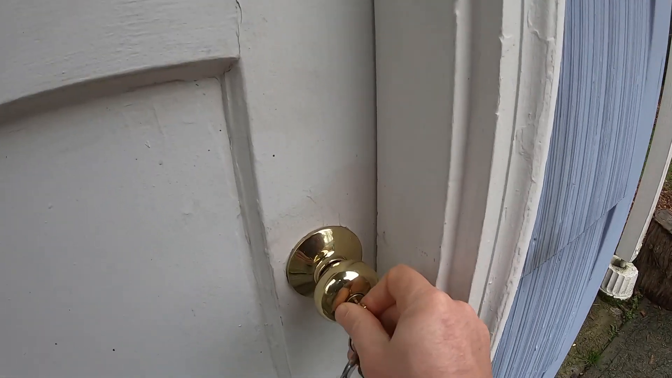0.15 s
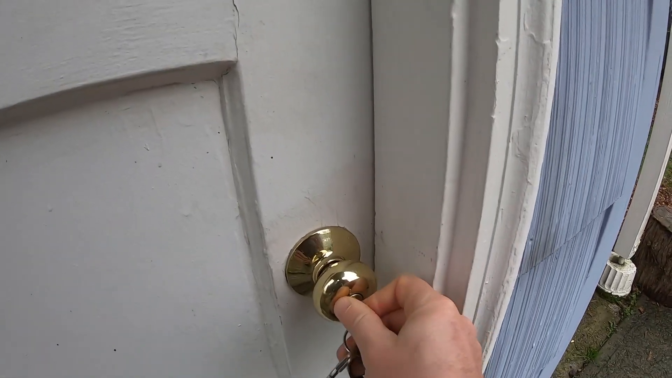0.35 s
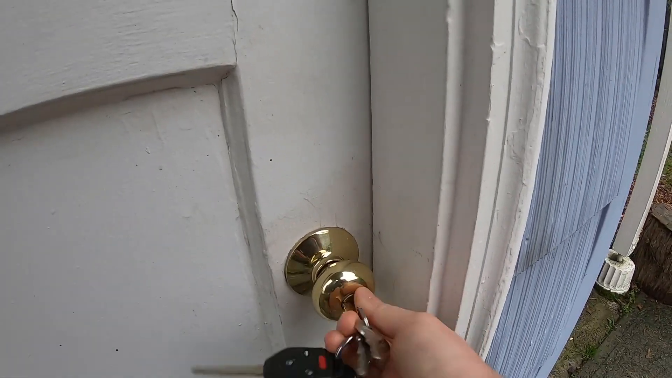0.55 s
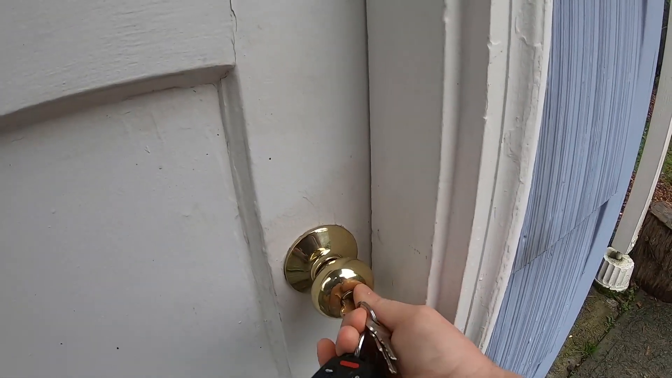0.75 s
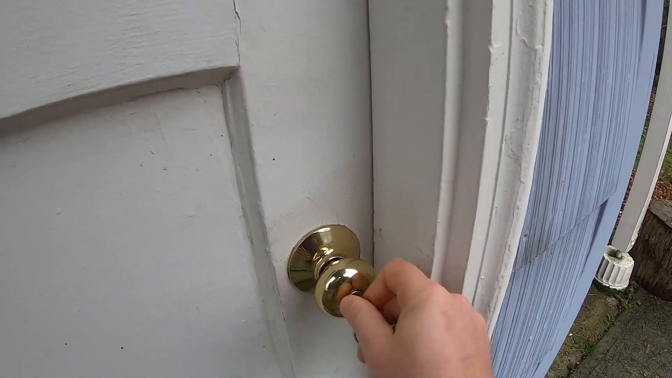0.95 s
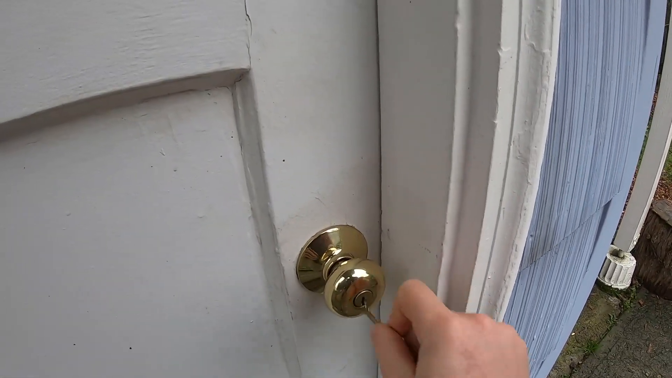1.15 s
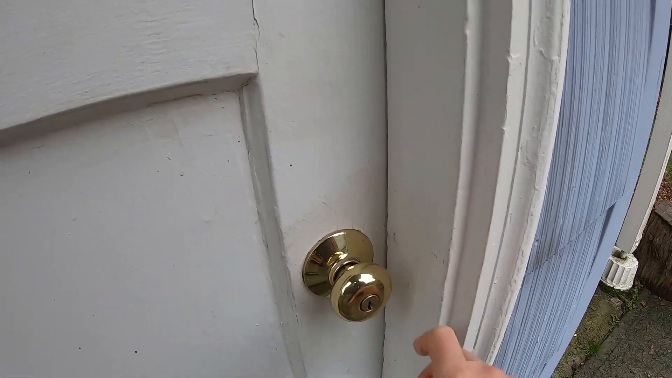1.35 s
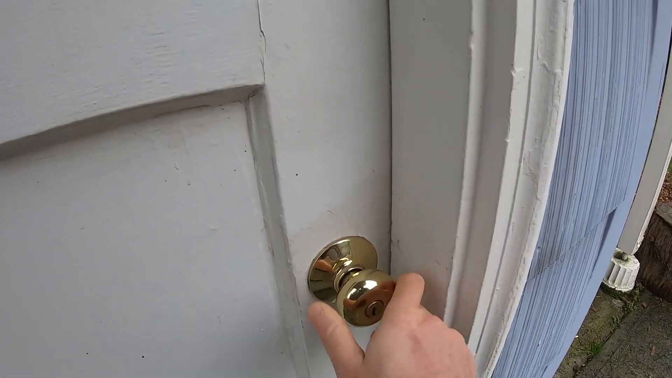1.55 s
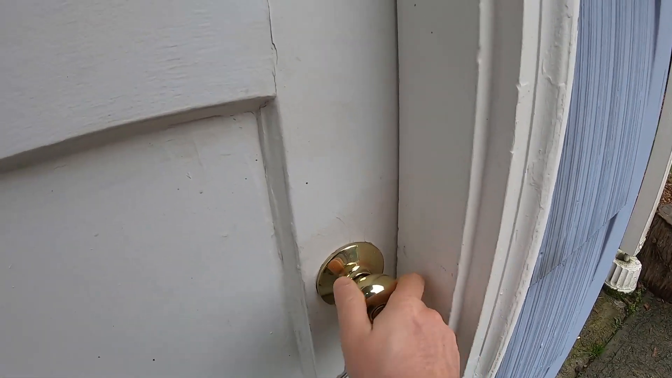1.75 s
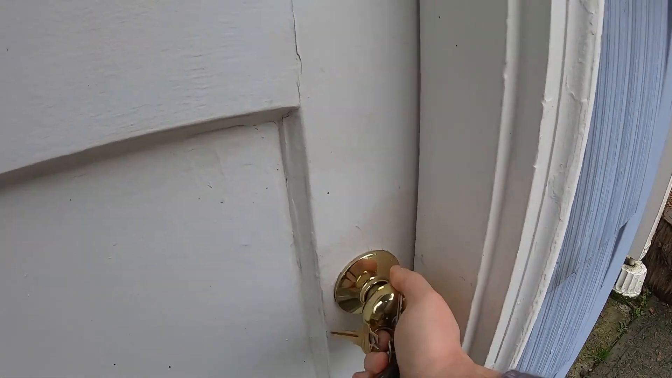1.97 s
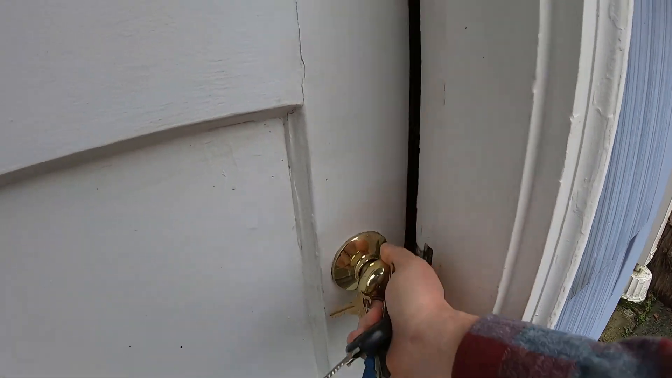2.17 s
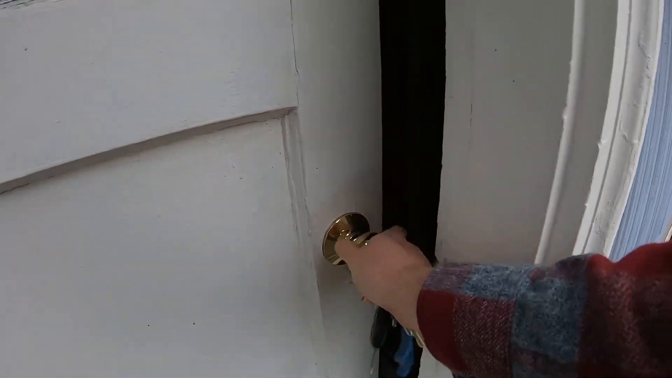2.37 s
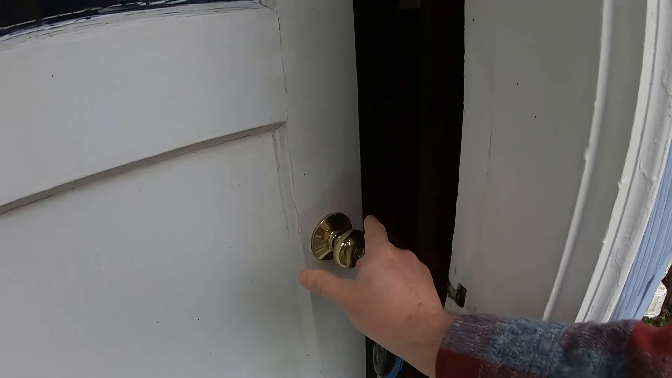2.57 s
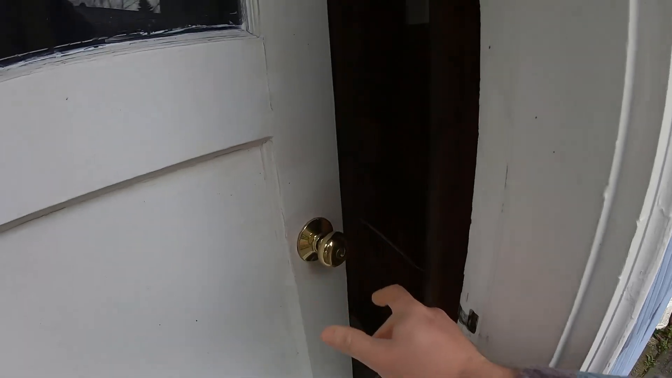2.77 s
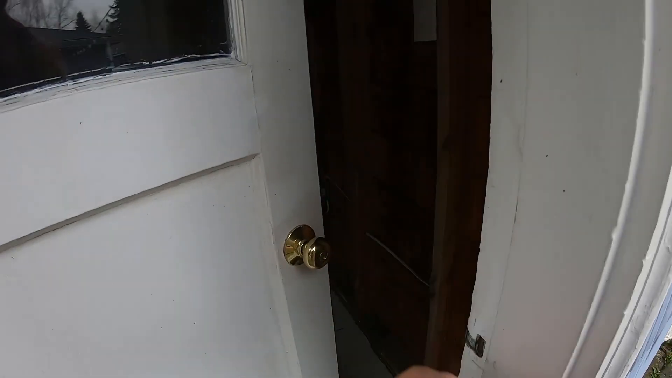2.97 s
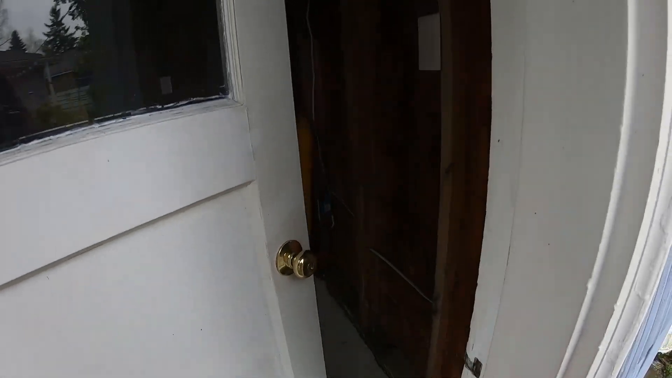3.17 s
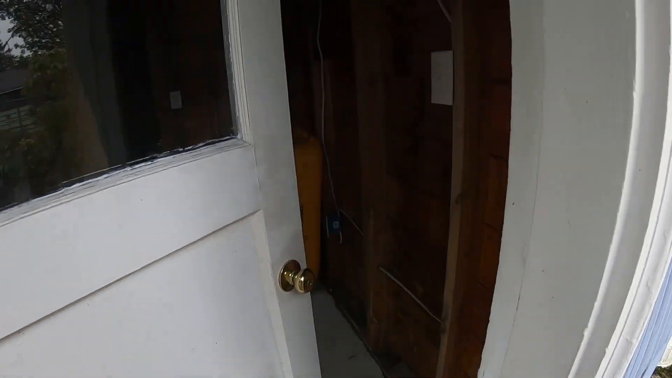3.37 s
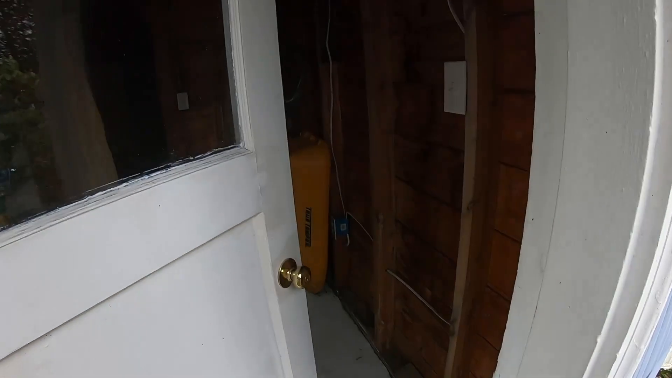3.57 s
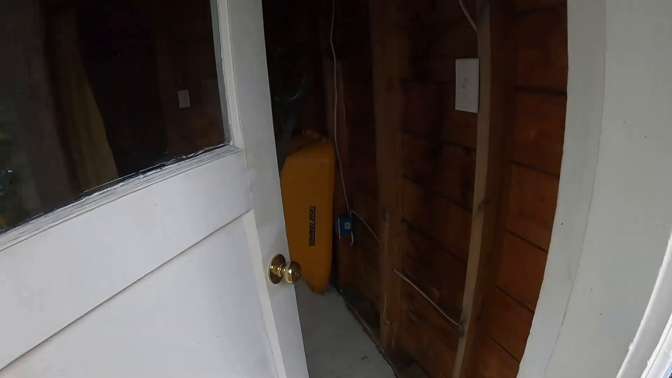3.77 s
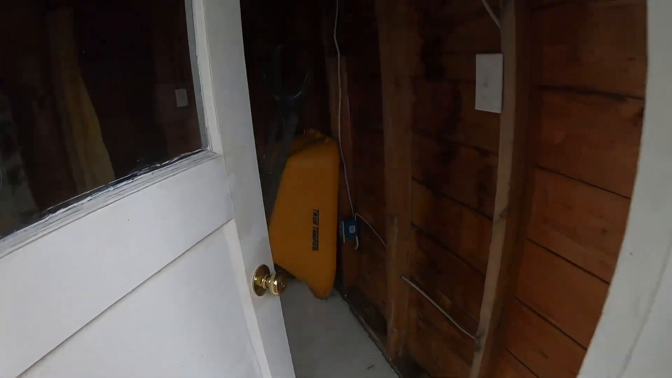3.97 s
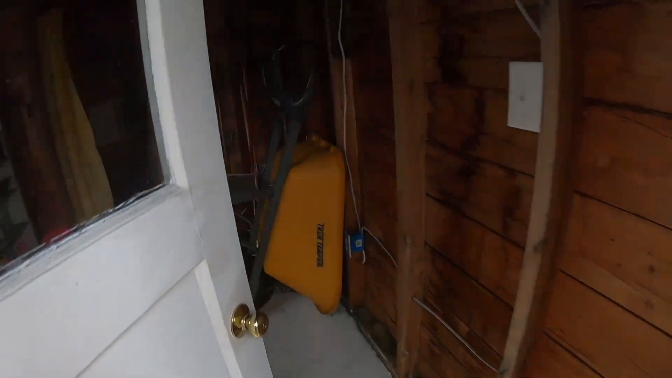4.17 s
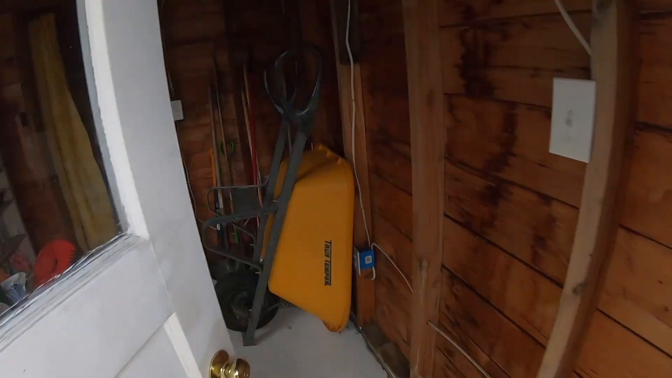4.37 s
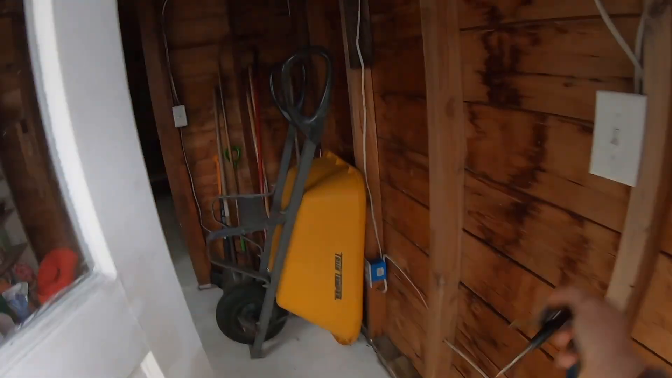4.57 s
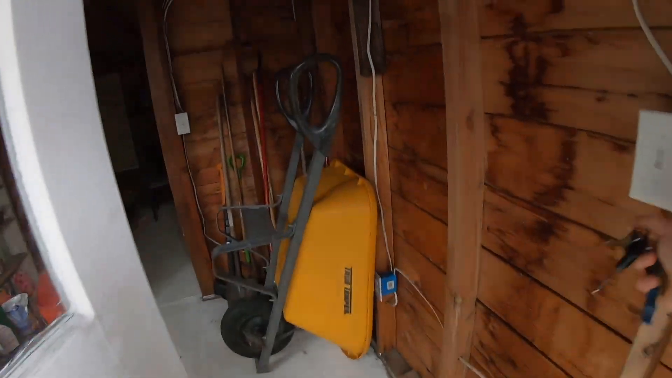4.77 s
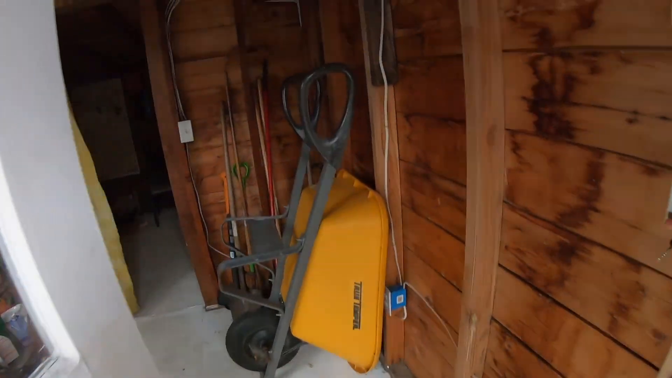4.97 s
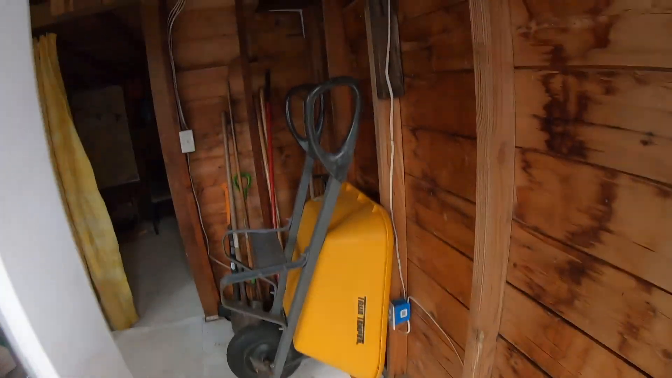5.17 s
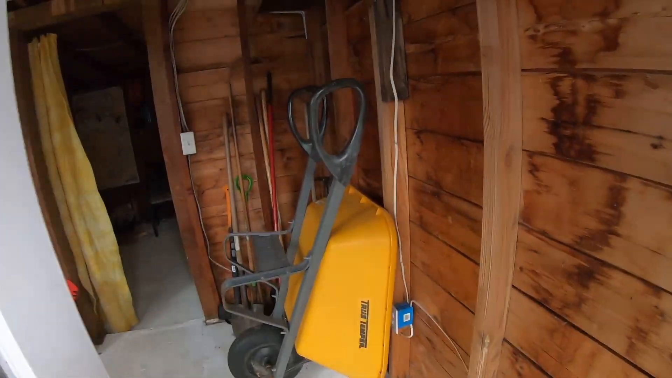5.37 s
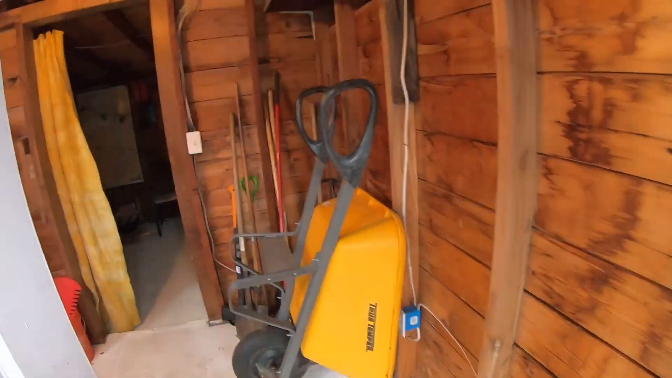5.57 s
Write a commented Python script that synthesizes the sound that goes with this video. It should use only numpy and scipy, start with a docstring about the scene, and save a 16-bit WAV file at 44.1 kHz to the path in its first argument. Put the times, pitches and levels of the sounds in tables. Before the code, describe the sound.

A close stereo microphone stands by a wooden door outdoors. From the start to about 1 second, a key clicks and scrapes in a brass knob lock, with low thumps from the door panel. Near 1.2 seconds the key ratchets quickly out over the pins and the bunch tinkles. From about 1.5 to 2.5 seconds the knob and latch rattle and clack, and the door opens with hollow booms. The keys keep chiming in the hand in short shakes, brightest and loudest from 3.7 to 4.4 seconds, ending around 4.6. A few soft, blunt footsteps land on boards between 4.6 and 5 seconds. At about 5.4 seconds a wall switch snaps sharply, a little to the side, with a short room echo. Underneath, a distant engine drones, slowly falling in pitch, over a soft outdoor hiss and rumble that ease toward the end.

```python
"""On the doorstep, a close stereo microphone by a wooden door. A key turns in the brass knob lock and
ratchets out over the pins; the knob is twisted and the door swings in, its panel booming. The bunch
chimes and clacks in the hand as key strikes key. Shoes step onto the boards inside and, off to the side,
a wall switch snaps. All along, a far engine drones with falling pitch over the outdoor wash."""
import sys
import numpy as np
from scipy import signal
from scipy.fft import rfft, irfft, next_fast_len
from scipy.io import wavfile
from scipy.ndimage import uniform_filter1d

SR = 44100
rng = np.random.default_rng(int(sys.argv[2]) if len(sys.argv) > 2 else 0)


def to_wav(s):
    """Save 16-bit WAV."""
    ch = np.atleast_2d(s).T  # columns
    pcm = np.round(np.clip(ch, -1, 1) * 32767)  # PCM
    wavfile.write(sys.argv[1], SR, pcm.astype(np.int16))


N = 248283

# blows in lock, knob and latch: start_s, metal_db, wood_db, treble_db, favoured_hz, tick_over_rattle_db
LOCK_BLOWS = [(0.0531, -20.5, -25.5, -27.5, 4000, 6.5), (0.0813, -17, -14.5, -16, 2770, 6),
              (0.0844, -9, -11, -32, 3630, 9), (0.1213, -32, -22.5, -46, 3320, 23),
              (0.156, -28, -36, -32.5, 5930, 11), (0.5075, -4.5, -10, -22, 3410, 5),
              (0.5145, -13.5, -11, -15.5, 5650, 9), (0.5185, -4.5, -12, -17, 3750, 5),
              (0.5432, -22.5, -29, -29.5, 5470, -1), (0.5697, -26, -29, -35, 2050, -5),
              (.6047, -31, -39, -32, 4030, 14), (.6165, -33, -43, -30, 4500, 12),
              (.6245, -30, -36, -31, 5500, 10.5), (0.6443, -22.5, -49, -22, 4930, 4.5),
              (0.6478, -10, -27.5, -18, 3330, 25.5), (0.675, -16.5, -36, -19, 1700, 7.5),
              (0.676, -17, -52, -17, 3450, 22), (0.6872, -6, -44, -8.5, 3130, 15),
              (.7045, -16, -56, -20, 2900, 12.5), (0.7197, -26, -55, -23, 1800, 8),
              (0.8598, -26, -44, -52, 3700, 30), (0.8864, -16.5, -25, -31, 3700, 14),
              (.948, -40, -39, -40, 5000, 12), (.977, -34, -37, -40, 5030, 6),
              (1.043, -20, -41, -35, 3540, 19), (1.0952, -24, -22.5, -31, 3170, 8),
              (1.1199, -13.5, -24.5, -21.5, 3640, 10.5), (1.194, -25, -44, -26, 4460, 11),
              (1.457, -18.5, -39, -22, 3730, 24), (1.5272, -27.5, -14, -34.5, 1500, 4),
              (1.674, -27.5, -19.5, -43, 1510, 11), (1.7571, -21, -22.5, -49, 3100, 13),
              (1.772, -43, -27, -57, 3470, 4), (1.8068, -14.5, -20.5, -39, 3150, 10.5),
              (1.8364, -24, -20.5, -28, 3090, 8.5), (1.846, -13.5, -36, -47, 3770, 9.5),
              (1.854, -7.5, -38, -24, 5760, 19), (1.872, -9.5, -16.5, -23, 3400, 18),
              (1.9644, -27.5, -50, -31, 3240, 8), (1.9801, -11.5, -27.5, -21, 3320, 5.5),
              (1.9938, -13, -16, -15.5, 3320, 8.5), (2.0207, -17.5, -46, -29, 2210, 6),
              (2.0468, -18.5, -10, -25, 2970, -12), (2.0541, -17, -21, -28, 1660, 19),
              (2.092, -19.5, -24, -25, 2440, 15), (2.137, -25, -23, -32, 2120, 3),
              (2.1516, -27, -34.5, -34, 5160, 4), (2.3184, -30, -30.5, -40, 1790, 2),
              (2.345, -30, -27.5, -38, 2100, -34), (2.3813, -16, -17.5, -23.5, 1910, 2),
              (2.393, -11, -15.5, -20, 1900, -1), (2.4087, -24.5, -27, -32, 2300, 3)]
# small irregular clicks and scrapes of key, knob and latch: start_s, end_s, metal_db, wood_db
LOCK_RATTLES = [(0.095, 0.14, -35, -32), (0.578, 0.606, -33.5, -29), (0.695, 0.744, -38, -61),
                (0.799, 0.942, -40, -35.5), (1.726, 1.973, -37, -32), (1.98, 2.04, -26, -26.5),
                (2.209, 2.306, -43, -49), (2.424, 2.496, -35, -34)]
# door panel and boards are jolted: start_s, boom_db, thud_db, knock_db
DOOR_JOLTS = [(0.058, -5, -39, -46), (0.087, -17, -11, -13.5), (0.518, -32, -45, -50),
              (1.101, -3.5, -17, -23.5), (1.124, -13.5, -30, -16), (1.53, -44, -27, -35),
              (1.812, -33, -15, -16.5), (1.859, -40, -17, -18.5), (1.992, -8.5, -10.5, -5.5),
              (2.05, -28, -11.5, -17), (2.15, -24, -18, -16), (2.33, -8, -23, -25),
              (2.378, -10, -11.5, -14.5), (2.44, -16, -15, -23), (2.658, -23, -48, -56),
              (4.706, -48.5, -19.5, -22), (4.746, -47, -20, -41), (4.949, -47.5, -15.5, -24.5),
              (5.439, -50, -11, -41)]
# keys and fob knock together: start_s, middle_db, treble_db, favoured_hz
BUNCH_CLACKS = [(1.3482, -33.5, -34, 2230), (1.384, -32, -32, 3100), (2.648, -34.5, -32, 3480),
                (2.662, -56, -40, 4800), (3.115, -28.5, -27, 2200), (3.302, -24.5, -30.5, 4970),
                (3.705, -26, -35, 6300), (3.733, -31, -30.5, 5760), (3.7712, -24, -26, 5760),
                (3.8012, -18, -18, 3540), (3.808, -18, -48, 5700), (3.851, -22, -23, 3880),
                (3.8712, -49, -41, 2910), (3.9898, -28, -36, 5310), (4.047, -25.5, -26, 3140),
                (4.094, -13, -13, 2460), (4.107, -17, -21, 3000), (4.1416, -25.5, -31, 2850),
                (4.173, -26.5, -29, 1660), (4.209, -18, -26.5, 2850), (4.2538, -21.5, -19.5, 2360),
                (4.3, -23.5, -29, 2500), (4.353, -28, -32, 1620), (4.5505, -18.5, -18.5, 5500),
                (4.568, -21.5, -28, 5100), (4.586, -17.5, -17.5, 4150), (4.6095, -25.5, -28, 4540)]
# a key blade is struck, gripped or free: start_s, peak_db, favoured_hz, t60_factor
KEY_STRIKES = [(1.001, -47, 6900, 0.33), (1.348, -27.5, 10100, 1.2), (1.3851, -23, 10130, 0.52),
               (1.4151, -37, 10330, .6), (1.9845, -13.5, 6950, 1.1), (1.9994, -20.5, 6770, 0.43),
               (2.0194, -22, 8110, 1.8), (2.4094, -23, 6800, 1.1), (2.414, -26.5, 10600, 1.2),
               (2.421, -27, 6180, 1.1), (2.598, -33.5, 7020, 0.35), (2.646, -19, 6555, 0.38),
               (2.651, -52, 10000, 0.48), (2.6664, -29, 9600, 1.8), (2.7294, -35, 6530, 0.92),
               (2.7694, -38, 9500, 0.76), (2.9452, -33.5, 9860, .6), (3.037, -35, 6480, .6),
               (3.043, -37.5, 14600, 0.74), (3.1154, -21, 9400, 0.46), (3.124, -29, 10090, 0.9),
               (3.12, -34, 6580, 1.4), (3.187, -39, 8740, .4), (3.2455, -27.5, 6590, 0.78),
               (3.251, -38.5, 10120, .8), (3.2804, -36, 9480, .6), (3.307, -32, 9800, 0.65),
               (3.3572, -30, 9700, 0.49), (3.709, -41, 6550, .8), (3.792, -7, 8940, 0.26),
               (3.7975, -6.5, 9600, 0.56), (3.809, -15, 10120, .5), (3.803, -26, 14000, 0.54),
               (3.8294, -21, 9300, 1.3), (3.9913, -21, 9550, 1.3), (3.993, -36.5, 6555, 1.2),
               (4.0094, -25, 9740, 0.95), (4.0716, -14.5, 9430, 1.1), (4.094, -20.5, 10500, 0.65),
               (4.137, -35, 8110, 1), (4.2388, -20, 6200, .8), (4.3023, -17.5, 6300, 0.38)]
# the bunch is shaken: start_s, end_s, level_db
BUNCH_SHAKES = [(1.312, 1.412, -44.5), (1.98, 2.04, -52), (2.41, 2.465, -38.5), (2.635, 2.845, -43.5),
                (2.933, 3.094, -52.5), (3.088, 3.236, -49), (3.233, 3.375, -43.5), (3.695, 3.775, -41),
                (3.79, 3.892, -46.5), (3.905, 3.962, -50), (3.977, 4.38, -30), (4.529, 4.69, -48)]
# shoes on sill and floor: start_s, middle_db, boards_db, treble_db, favoured_hz
FOOTFALLS = [(4.642, -32, -41, -60, 2000), (4.7152, -24.5, -32.5, -34, 2360),
             (4.7425, -28.5, -17.5, -45, 3640), (4.795, -57, -54, -59, 2000), (4.8877, -59, -28, -67, 2760),
             (4.919, -51, -32, -69, 1560), (4.9752, -62, -31.5, -68, 1525)]
# the switch lever's contacts: start_s, middle_db, wall_db, treble_db, favoured_hz
LEVER_BLOWS = [(5.369, -38.5, -37, -66, 2330), (5.4097, -33.5, -45, -39, 3550),
               (5.4291, -7, -9, -15.5, 3900), (5.442, -19.5, -19.5, -22, 1660),
               (5.598, -58, -44, -60, 2500)]
# resonances of lock, bunch, floor and switch: pitch_hz, width_hz, level_db
LOCK_MODES = [(363, 43, 5), (518, 153, -4), (746, 320, -10), (873, 223, 1), (1277, 720, -1),
              (1763, 350, 2.5), (2420, 310, 0.5), (3390, 580, -2.5), (3720, 520, -1), (4530, 1130, 1),
              (5510, 850, -4), (6750, 4300, 8), (8030, 1600, 10), (10040, 390, 0), (11800, 1700, -10.5)]
BUNCH_MODES = [(1107, 200, -1), (1750, 330, 1.5), (2436, 120, -3.5), (2814, 310, 0.5), (3440, 700, -2),
               (4090, 960, -1.5), (5464, 1180, 1.5), (6060, 1830, 12.5), (7420, 2800, 2), (9520, 230, 3),
               (12200, 1200, -26.5), (13150, 2100, -37.5)]
FLOOR_MODES = [(204, 40, -10), (313, 145, 5.5), (504, 490, -2.5), (736, 1100, -8), (2210, 960, -10),
               (4320, 8700, 18), (6560, 5000, -1)]
SWITCH_MODES = [(787, 130, -0.5), (1025, 130, 12), (1204, 200, -3), (1650, 94, 7.5), (2140, 180, 5),
                (2480, 470, -4), (2900, 650, -9), (3670, 500, -4), (4150, 540, -6.5), (5240, 880, -10.5),
                (6100, 4300, 28), (9100, 1400, -7)]
# ringing modes of the door panel and of free keys: pitch_hz, level_db, t60_s
PANEL_MODES = [(35.3, -8, 0.98), (53.6, 0.5, 0.27), (128.4, 3, 0.11), (191, -7.5, 0.21), (217.3, -9.5, 0.2),
               (317, 1.5, 0.049), (397.6, -5.5, 0.093)]
BLADE_MODES = [(5650, -11, .06), (6180, -8, .13), (6550, -2, .13), (7300, -16, .05), (8100, -6, .13),
               (8900, -14, .05), (9385, -9, .05), (9525, -1, .14), (9850, -9, .05), (10090, -4, .12),
               (10560, -10, .06), (10750, -9, .12), (11460, -13, .16), (11930, -21, .07), (12520, -14, .15),
               (13250, -17, .13), (13440, -22, .08), (13920, -16, .12), (14100, -20, .11),
               (14510, -15, .15)]
# the far engine swells and fades: time_s, level_db
ENGINE_LEVELS = [(0.0, -31.5), (0.11, -22.5), (0.34, -45.5), (0.69, -24.5), (0.75, -29.5), (1.18, -25),
                 (1.22, -44), (1.32, -30), (2.07, -24), (2.26, -30), (2.37, -17), (2.62, -40),
                 (2.92, -23.5), (3.31, -37.5), (3.93, -38.5), (4.04, -29), (5.6, -45.5), (5.63, -51)]
# course of the outdoor wash: time_s, hiss_db, rumble_db, deep_rumble_db
WASH_LEVELS = [(0.0, -38, -34, -55), (0.22, -40, -33.5, -38), (0.64, -39.5, -37.5, -39.5),
               (2.35, -40, -35, -25.5), (2.9, -41.5, -38, -43.5), (3.3, -40, -37, -53),
               (3.8, -40, -39.5, -46), (4.97, -45.5, -38.5, -56), (5.63, -48, -38.5, -66)]
# tone colour of the wash: pitch_hz, density_db
WASH_SPECTRUM = [(25, -17), (53, -3), (86, -0.5), (213, -13), (270, -25), (330, -16.5), (450, -25),
                 (833, -21.5), (1310, -25), (5140, -33), (7500, -39.5), (9770, -50.5), (15000, -79.5)]
# stereo image from door, room and distance: pitch_hz, likeness_ratio, left_over_right_db, left_lead_rad
MIC_DOOR = [(250, 1, 2.5, 0.81), (555, 0.92, -0.5, 0.11), (855, 0.67, 7.5, -1.5), (1750, 0.83, 1.5, 1),
            (2980, 1, -0.5, 0.81), (3680, 1, 0.5, 1), (5440, 0.081, -3, 0.29), (8000, 0.28, -2.5, 0.92),
            (12100, 0.13, 0, 1)]
MIC_ROOM = [(200, 0.97, -1, 0.079), (845, 0.64, 0, 0.28), (1720, 0.91, -3.5, 1.24),
            (3580, 0.74, -2.5, 0.56), (5230, 0.24, -4.5, 0.33), (7400, 0.34, -6, 3.1),
            (10600, 0.16, 3, 3.1), (13600, 0.45, -3, 8.2)]
MIC_FAR = [(101, 0.94, -0.5, .05), (300, 0.97, -1, 0.046), (850, 0.63, -1.5, 0.31),
           (1870, 0.058, -0.5, 0.63), (3100, 0.78, -0.5, 0.265), (4020, 0.94, -1.5, 0.34),
           (5600, 0.7, -13, 0.37), (7000, 0.18, -7, 0.7), (10000, .1, -2, 0.57)]

LOOSE_DB = 0.57  # weaker blows rattle longer: dB of t60 per dB of level
TICK_WIDENING, TICK_T60_S = 1.88, 0.0063  # a tick is too short to pick out single modes
CLACK_LOW_DB, CLACK_TICK_DB = -53, 6.5
SHAKE_RISE_S, SAG_DB_PER_S, SETTLE_DB_PER_S = 0.026, -45, -400


def lock():
    """Brass parts strike and rattle in the wooden door, right at the microphone."""
    blows = [*LOCK_BLOWS, *key_pull(count=10), *lock_rattles(count=3)]
    metal = knocks(blows, LOCK_MODES, MIC_DOOR, rattle_s=0.044, grit_db=3.5, focus_db=7, scatter_db=5.5)
    return echoes(metal, t60=0.14, level_db=-13.5, dull_hz=5270)


def key_pull(count, start_s=1.134, gap_s=0.0051, tick_db=7.5):
    """Lock blows: pins ride over the teeth of the key at an even pace, hardest midway."""
    pin = np.arange(count)
    metal_db = -27.5 - 1.5 * (2 * pin / (count - 1) - 1) ** 2
    wood_db, treble_db = metal_db + 2.5, metal_db - 5
    hz = 2460 * np.exp(.25 * rng.standard_normal(count))
    return np.transpose([start_s + gap_s * pin, metal_db, wood_db, treble_db, hz, [tick_db] * count])


def lock_rattles(count):
    """Lock blows: key, knob and latch click and scrape at uneven times, each on another spot."""
    blows = []
    for start, end, metal_db, wood_db in LOCK_RATTLES:
        for k, (delay, softness, spot) in enumerate(rng.random((count, 3))):
            start_s = start + (end - start) * (k + delay) / count
            levels_db = np.array([metal_db, wood_db, metal_db - 4]) - 4 * softness
            blows.append((start_s, *levels_db, 1600 * 3 ** spot, 6))
    return blows


def keys():
    """The bunch clacks and chimes in the hand, with a short echo."""
    blows = [(s, db, CLACK_LOW_DB, treble, hz, CLACK_TICK_DB) for s, db, treble, hz in BUNCH_CLACKS]
    clacks = knocks(blows, BUNCH_MODES, MIC_ROOM, rattle_s=0.06, grit_db=3, focus_db=8.5, scatter_db=2)
    size = next_fast_len(N)
    spectra = rfft(chimes() + jingle(), size)
    ringing = irfft(stereo(*spectra, MIC_ROOM, np.fft.rfftfreq(size, 1 / SR)), size)[:, :N]
    return echoes(clacks + ringing, t60=.15, level_db=-15, dull_hz=8000)


def chimes():
    """A struck key rings most near its favoured pitch, buzzing as it brushes its neighbours."""
    out, t = np.zeros((2, N)), np.arange(8000) / SR
    hz, db, t60 = columns(BLADE_MODES)
    for start_s, peak_db, favoured_hz, grip in KEY_STRIKES:
        chance, detune, *phases = rng.standard_normal((4, len(hz), 1))
        share_db = db + 11 * np.exp(-(np.log(hz / favoured_hz) / 0.03) ** 2) + 4 * chance
        turns = hz * (1 + 0.0025 * detune) * t + np.array(phases)
        brushing = 1 + 0.38 * unit_rms(uniform_filter1d(rng.standard_normal((len(hz), len(t))), 180))
        ring = (gain(share_db - 60 * t / (t60 * grip)) * brushing * np.sin(2 * np.pi * turns)).sum(1)
        add(out, start_s, gain(peak_db) * ring / abs(ring).max() * np.minimum(t / 0.0031, 1))
    return out


def jingle(touches_per_s=30, scrapes_per_s=5000):
    """Swinging keys tinkle and scrape at random."""
    out, t, swing = np.zeros((2, N)), np.arange(8000) / SR, shaking()
    for hz, db, t60 in BLADE_MODES:
        touches = rng.random((2, N)) < touches_per_s / SR
        force = swing * gain(3.8 * rng.standard_normal(N).clip(-2, 2))
        tuned_hz = hz * (1 + .004 * rng.standard_normal((2, 1)))
        envelope = gain(db - 60 * t / (0.8 * t60)) * np.minimum(t / .0015, 1)
        ring = envelope * np.sin(2 * np.pi * tuned_hz * t)
        out += signal.oaconvolve(touches * force, ring, axes=1)[:, :N]
    catches = rng.random((2, N)) < scrapes_per_s / SR
    scrapes = catches * gain(5 * rng.exponential(1, N).clip(0, 3)) * rng.standard_normal(N)
    bright = signal.butter(4, [4500, 10800], "band", fs=SR, output="sos")
    return out + gain(-0.5) * signal.sosfilt(bright, swing * scrapes)


def shaking():
    """Each shake of the hand rises quickly, sags while it lasts and settles."""
    swing, t = np.zeros(N), np.arange(N) / SR
    for start, end, db in BUNCH_SHAKES:
        fall_db = SAG_DB_PER_S * np.maximum(t - start, 0) + SETTLE_DB_PER_S * np.maximum(t - end, 0)
        swing += np.clip((t - start) / SHAKE_RISE_S, 0, 1) * gain(db + fall_db)
    return swing


def door():
    """The jolted panel rings; the push is soft, so the lower a mode, the slower it swells."""
    out, t = np.zeros((2, N)), np.arange(SR) / SR
    hz, db, t60 = columns(PANEL_MODES)
    for start_s, boom_db, thud_db, knock_db in DOOR_JOLTS:
        detune = 1 + 0.05 * rng.standard_normal((len(hz), 1))
        level_db = db + np.select([hz < 90, hz < 270], [boom_db, thud_db], knock_db)
        swell = 1 - np.exp(-t * hz / 2.1)
        rings = swell * gain(level_db - 60 * t / t60) * np.sin(2 * np.pi * hz * detune * t)
        add(out, start_s, rings.sum(0) * gain([[-.8], [.8]]))
    return out


def footsteps(tick_db=1.5):
    """Shoes land bluntly on the sill and floor boards."""
    blows = [(*row, tick_db) for row in FOOTFALLS]
    return knocks(blows, FLOOR_MODES, MIC_ROOM, rattle_s=.076, grit_db=3.5, focus_db=-.5, scatter_db=5.5)


def wall_switch(tick_db=4):
    """The lever is touched, then snaps over and bounces."""
    blows = [(*row, tick_db) for row in LEVER_BLOWS]
    return knocks(blows, SWITCH_MODES, MIC_ROOM, rattle_s=0.047, grit_db=3, focus_db=6.5, scatter_db=3)


def far_engine(top_hz=103, floor_hz=68, sink_per_s=0.4):
    """One low engine order holds its pitch, then sinks, wavering on its way through the air."""
    t = np.arange(N) / SR
    hz = np.minimum(floor_hz + 42 * np.exp(-sink_per_s * t), top_hz)
    turns = np.cumsum(hz * (1 + 0.019 * waver(17, t))) / SR
    level_db = np.interp(t, *np.transpose(ENGINE_LEVELS)) + 1.8 * waver(40, t)
    return np.sqrt(2) * gain(level_db) * np.sin(2 * np.pi * turns) * gain([[-.4], [.4]])


def outdoor_wash():
    """Distant, faintly patchy noise; deep rumble, rumble and hiss follow their own levels."""
    frames, hz = N // 512 + 5, np.fft.rfftfreq(2048, 1 / SR)
    noise = rng.standard_normal((5, frames, 1025))
    patches_db = 2 * unit_rms(uniform_filter1d(uniform_filter1d(noise[4], 24, 1), 7, 0))
    time_s, *levels = np.transpose(WASH_LEVELS)
    frame_s = np.arange(frames) * 512 / SR
    hiss_db, rumble_db, deep_db = (np.interp(frame_s, time_s, db)[:, None] for db in levels)
    low, deep = 1 / (1 + (hz / 430) ** 4), 1 / (1 + (hz / 62) ** 8)
    level_db = deep * deep_db + (low - deep) * rumble_db + (1 - low) * hiss_db
    spectra = stereo(noise[0] + 1j * noise[1], noise[2] + 1j * noise[3], MIC_FAR, hz)
    spectra *= gain(at_pitch(hz, *np.transpose(WASH_SPECTRUM)) + level_db + patches_db + 1)
    return signal.istft(spectra.transpose(0, 2, 1), nperseg=2048, noverlap=1536)[1][:, :N]


def knocks(blows, modes, mic, rattle_s, grit_db, focus_db, scatter_db, size=4096):
    """Each blow, a tick and a dying rattle of uneven contacts, rings a body's modes in three bands."""
    out, t, hz = np.zeros((2, N)), np.arange(size) / SR, np.fft.rfftfreq(size, 1 / SR)
    mode_hz, width_hz, mode_db = columns(modes)
    fade = np.minimum((t[-1] - t) / t[size // 4], 1)
    for start_s, middle_db, low_db, treble_db, favoured_hz, tick_db in blows:
        t60 = rattle_s * gain(min(-LOOSE_DB * (max(middle_db, low_db) + 13.5), 4))
        contacts = unit_rms(gain(grit_db * np.minimum(rng.exponential(1, size // 32), 3).repeat(32)))
        dying = gain(-60 * (t / max(t60, .005)) ** 1.424) * (1 - np.exp(-t / (0.019 * t60)))
        rise_s = .0004 * gain(max(14 - tick_db, 0))  # a blunt blow starts slower
        noise = rng.standard_normal((2, size)) * np.minimum(t / rise_s, 1)
        rattle = stereo(*rfft(noise * contacts * dying), mic, hz)
        tick = stereo(*rfft(noise * gain(tick_db - 60 * t / TICK_T60_S)), mic, hz)
        chance, detune = rng.standard_normal((2, len(modes), 1))  # no two blows land on the same spot
        favoured = np.exp(-(np.log(mode_hz / favoured_hz) / 0.17) ** 2) * (mode_hz >= 1500)
        share = gain(mode_db + focus_db * favoured + scatter_db * chance)
        tuned = mode_hz * (1 + .025 * detune)
        sharp, blurred = (share * (w / (w + 2j * (hz - tuned)) - w / (w + 2j * (hz + tuned))) ** 2
                          for w in (width_hz, TICK_WIDENING * width_hz))
        for low_hz, high_hz, db in (0, 1500, low_db), (1500, 6000, middle_db), (6000, SR, treble_db):
            band = (mode_hz[:, 0] >= low_hz) & (mode_hz[:, 0] < high_hz)
            bass_cut = (1j * hz / (1j * hz + 0.78 * low_hz + 1)) ** 3  # small parts radiate no bass
            ring = fade * irfft(bass_cut * (rattle * sharp[band].sum(0) + tick * blurred[band].sum(0)))
            add(out, start_s, gain(db) * ring / abs(ring.mean(0)).max())
    return out


def echoes(sound, t60, level_db, dull_hz):
    """Adds sparse reflections, different on each side, dying away and dulled by soft walls."""
    size = SR // 2
    taps = np.zeros((2, size))
    arrivals = np.arange(100, size - 20, 20) + rng.integers(0, 20, (2, (size - 101) // 20))
    np.put_along_axis(taps, arrivals, rng.choice([-1., 1.], arrivals.shape), 1)
    taps *= gain(-60 * np.arange(size) / SR / t60)
    taps = signal.lfilter(*signal.butter(1, dull_hz, fs=SR), taps)
    taps /= np.linalg.norm(taps[0])
    return sound + gain(level_db) * signal.fftconvolve(sound, taps, axes=1)[:, :N]


def stereo(first, second, mic, hz):
    """Two close ports: left hears one spectrum, right a blend of both, a level and phase step apart."""
    table_hz, *curves = np.transpose(mic)
    likeness, pan_db, lead_rad = (at_pitch(hz, table_hz, curve) for curve in curves)
    step = np.sqrt(gain(pan_db) * np.exp(1j * lead_rad))
    blend = likeness * first + np.sqrt(1 - likeness ** 2) * second
    return np.array([first * step, blend / step])


def waver(rate_hz, t):
    """Smooth random drift of rms about 1."""
    hz = np.geomspace(rate_hz / 20, rate_hz, 24)[:, None]
    waves = np.sin(2 * np.pi * (hz * t[::200] + rng.random((24, 1)))) / np.sqrt(hz)
    return np.interp(t, t[::200], unit_rms(waves.sum(0)))


def gain(db):
    """Decibels to gain."""
    return 10 ** (np.asarray(db) / 20)


def unit_rms(x):
    """Scales to rms 1."""
    return x / np.sqrt(np.mean(x ** 2) + 1e-20)


def columns(table):
    """Splits a table into upright columns."""
    return np.transpose(table)[:, :, None]


def at_pitch(hz, table_hz, values):
    """Reads a curve on a log-frequency axis."""
    return np.interp(np.log(hz + 1), np.log(table_hz + 1), values)


def add(mix, start_s, sound):
    """Mixes a sound in at start_s."""
    part = mix[..., round(start_s * SR):][..., :sound.shape[-1]]
    part += sound[..., :part.shape[-1]]


def scene():
    """Lock, keys and door up close, steps and switch in the room, engine and wash far off."""
    close = lock() + keys()
    room = echoes(footsteps() + wall_switch(), t60=0.33, level_db=-14.5, dull_hz=1630)
    room = signal.lfilter(*signal.butter(1, 9000, fs=SR), room)  # off to the side, duller
    return close + room + door() + far_engine() + outdoor_wash()


def record(dry):
    """The microphone fades in the top octave, ahead of a steep band limit."""
    shaded = signal.sosfilt(signal.butter(8, 14400, fs=SR, output="sos"), dry)
    band_limit = signal.firwin(511, 15850, window=("kaiser", 9), fs=SR)
    return signal.oaconvolve(shaded, band_limit[None], "same")


dry = scene()
out = record(dry)
to_wav(out)
```